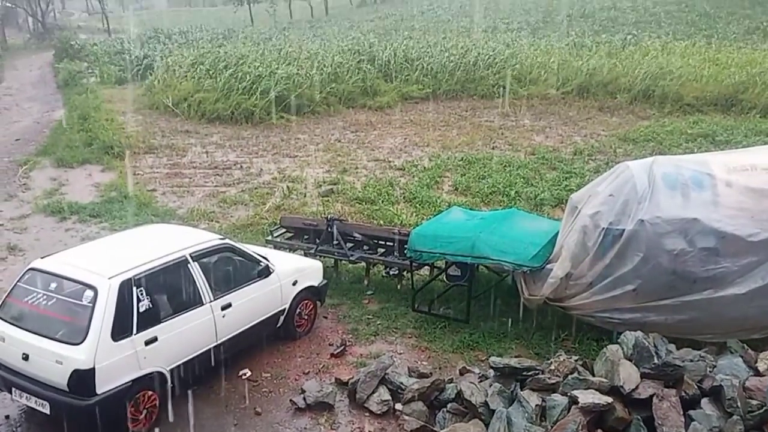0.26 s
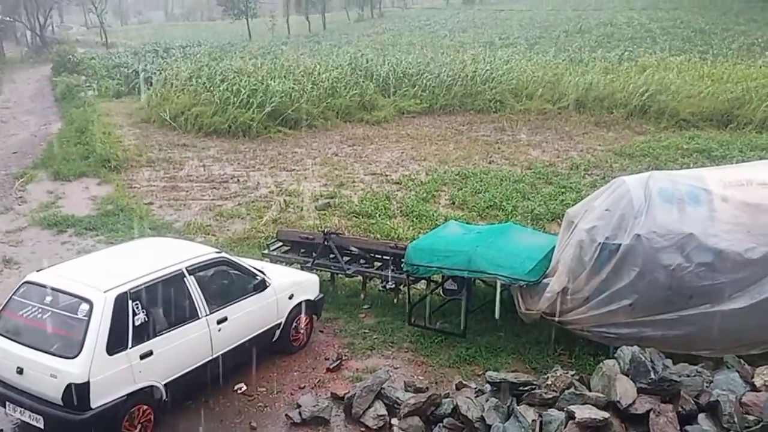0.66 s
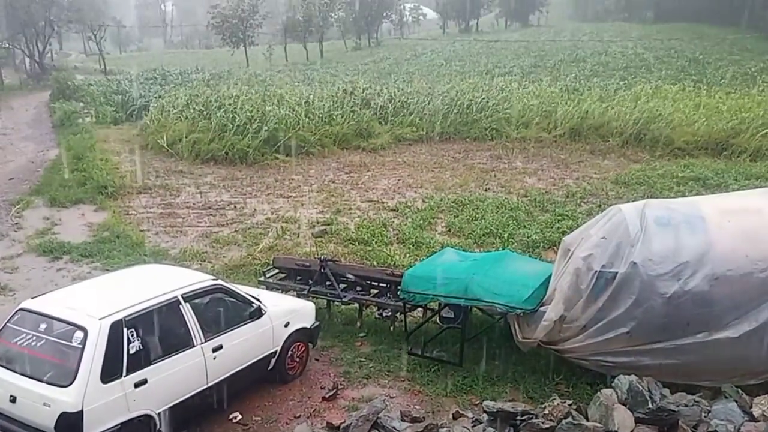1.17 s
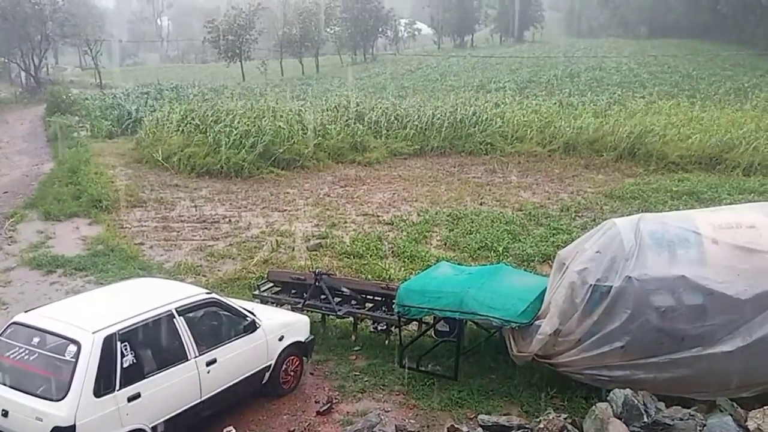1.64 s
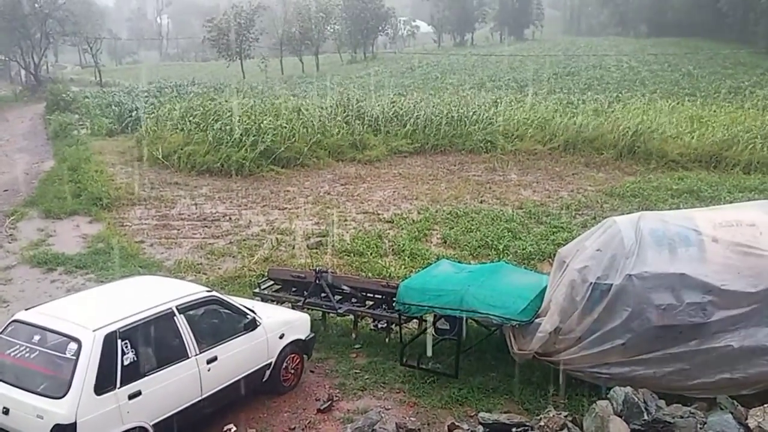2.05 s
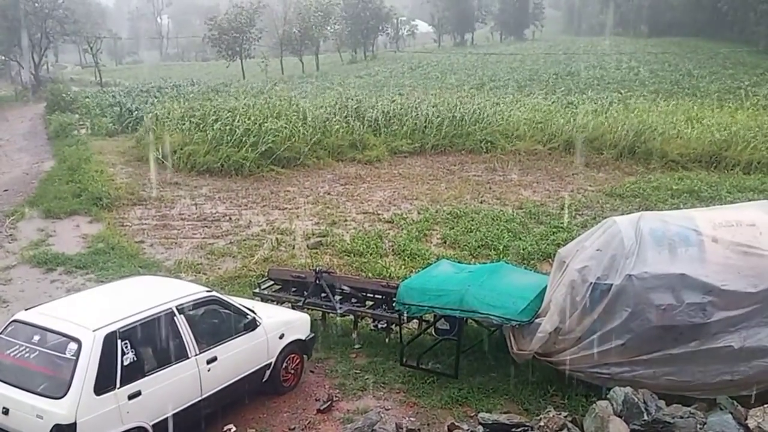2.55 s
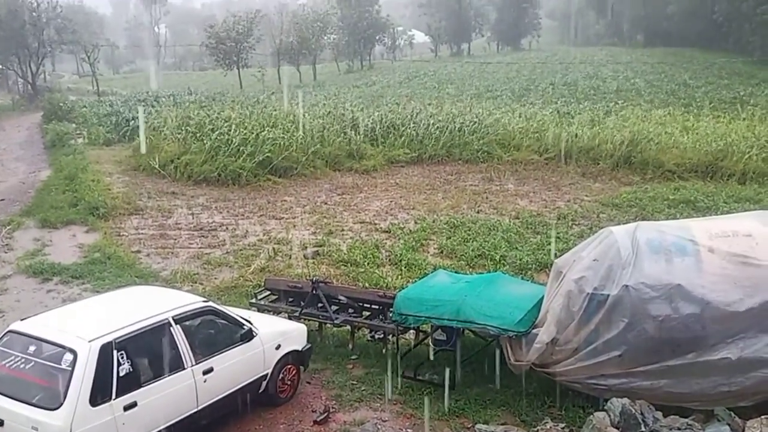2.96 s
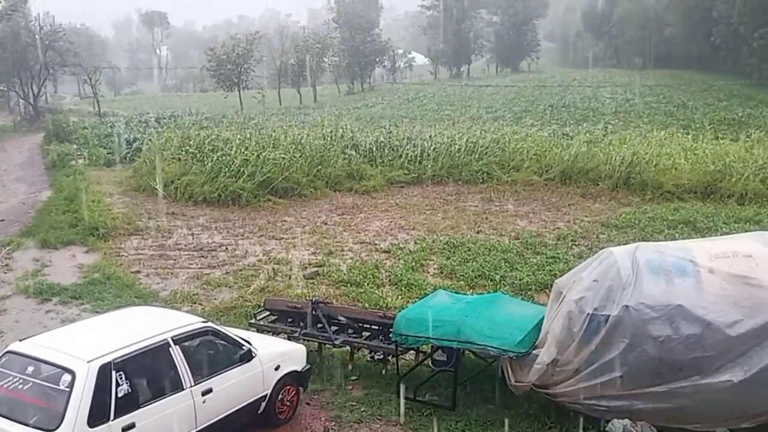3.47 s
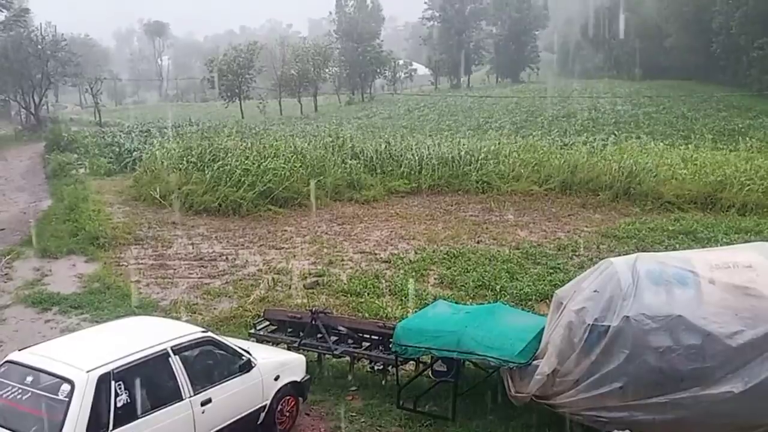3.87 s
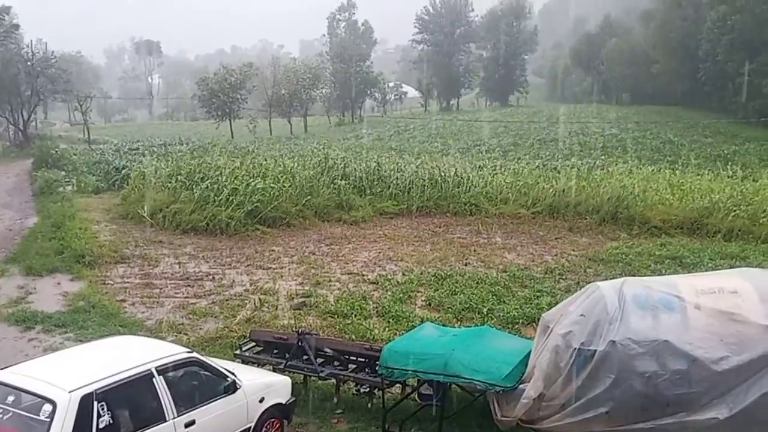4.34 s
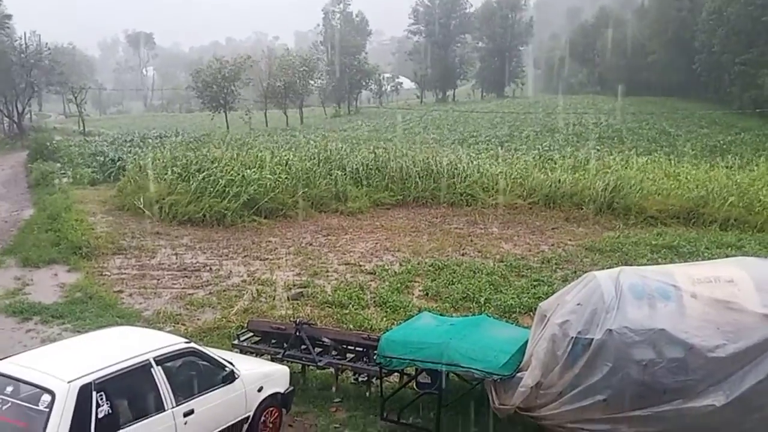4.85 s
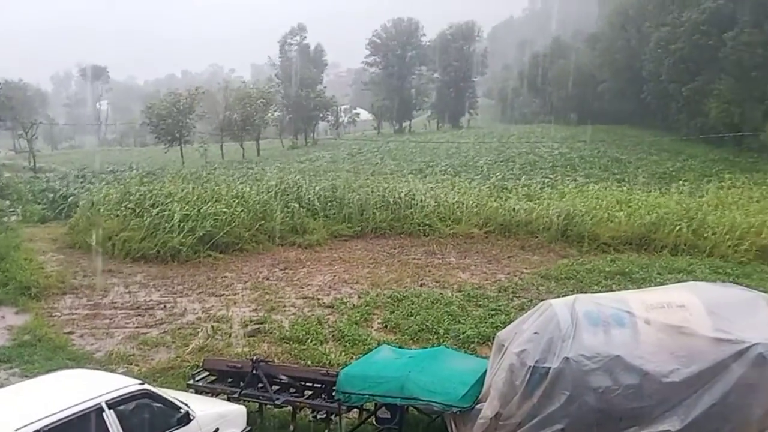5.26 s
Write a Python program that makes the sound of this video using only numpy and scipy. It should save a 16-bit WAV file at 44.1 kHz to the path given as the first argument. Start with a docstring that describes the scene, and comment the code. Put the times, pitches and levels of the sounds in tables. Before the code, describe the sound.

Heavy rain falls on open fields and a muddy yard, making an even hiss with a finer patter on leaves, stones and puddles. Fat drops splat close by throughout, and from about one second an occasional drip plinks into a puddle. Wind rumbles and puffs against the microphone, lulls midway, then builds again toward the end. It is heard from a sheltered spot above the yard.

```python
"""Heavy rain on open fields and a muddy yard, heard in mono from a sheltered spot above.
From the start, countless far impacts sum to a hiss, nearer ones patter on mud, stones and leaves,
bubbles ring in puddles, and turbulence rumbles at the microphone. Fat drops soon splat close by and
eddies buffet the port; from about 1 s an occasional heavy drip rings. The wind lulls around 3 s and
builds again from 4 s to the end, while the shower eases very slightly throughout."""
import sys
import numpy as np
from scipy import signal
from scipy.fft import rfft, irfft
from scipy.io import wavfile

SR = 44100
rng = np.random.default_rng(int(sys.argv[2]) if len(sys.argv) > 2 else 0)


def unload_wav(signal):
    """Save mono or channel-first audio to the path in sys.argv[1] as 16-bit WAV at rate SR, clipped to [-1, 1]."""
    wavfile.write(
        sys.argv[1],
        SR,
        np.round(np.clip(np.atleast_2d(signal).T, -1, 1) * 32767).astype(np.int16),
    )


N = 242987


def from_db(db):
    """Amplitude ratio of a level in decibels."""
    return 10 ** (np.asarray(db) / 20)


def unit_power(x):
    """Normalisation to a mean square of one."""
    return x / np.sqrt(np.mean(x ** 2) + 1e-20)


def drift(per_s):
    """Low-pass noise of unit spread that changes about per_s times a second."""
    step, settle = 40, 2000  # samples per point, points discarded
    pole = np.exp(-2 * np.pi * step * per_s / SR)
    slow = signal.lfilter([1], [1, -2 * pole, pole ** 2], rng.standard_normal(N // step + settle + 2))
    slow = unit_power(slow[settle:])
    return np.interp(np.arange(N) / step, np.arange(len(slow)), slow)


def coloured(x, spectrum):
    """Spectral shaping by levels interpolated over log frequency; the result has unit power."""
    hz, level_db = np.transpose(spectrum)
    bins_hz = np.maximum(np.fft.rfftfreq(N, 1 / SR), 1)
    gain = from_db(np.interp(np.log(bins_hz), np.log(hz), level_db))
    return unit_power(irfft(rfft(x) * gain, N))


def filtered(x, hz, kind, order=2):
    """Filtering with a maximally flat passband."""
    return signal.sosfilt(signal.butter(order, hz, kind, fs=SR, output="sos"), x + 1e-18)


def band(x, hz, octaves):
    """Band-pass filtering about a geometric centre frequency."""
    return filtered(x, [hz * 2 ** (-octaves / 2), min(hz * 2 ** (octaves / 2), .47 * SR)], "band")


def add_at(out, at, sound):
    """Linear superposition of a sound starting at sample `at`."""
    out[at:at + len(sound)] += sound[:N - at]


# Spectral density of the rain's hiss, patter and ticks: f/Hz, relative level/dB
RAIN_SPECTRUM = [(150, -15), (480, -5.5), (730, -8), (1100, -4), (1400, -5.5), (2500, 0), (4200, -0.3),
                 (4800, -3.5), (6100, 0.23), (7400, -2.5), (9100, -12), (12300, -16), (15400, -8)]


def far_hiss(waver_db):
    """Incoherent summation: impacts all over the fields, too many to resolve, merge into noise."""
    noise = rng.standard_normal(N) * from_db(waver_db * drift(per_s=2.8))
    return coloured(noise, RAIN_SPECTRUM)


def drop_energies(per_s, spread_db):
    """Random arrivals: most drops are small or far, and the shelter's edge limits the nearest."""
    amplitudes = from_db(spread_db * np.minimum(rng.exponential(1, N), 3.5))
    return (rng.random(N) < per_s / SR) * amplitudes ** 2


def die_away(energies, decay_s):
    """Exponential decay: each pulse of energy is spread over a tail."""
    pole = np.exp(-1 / (decay_s * SR))
    return signal.lfilter([1 - pole], [1, -pole], energies + 1e-18)


def patter(per_s_per_band, spread_db, impact_s, spray_s, spray_ratio, octaves):
    """Shot noise: each nearer impact is a short burst in one band, followed by a tail of spray."""
    out = np.zeros(N)
    for hz in np.geomspace(2200, 14000, num=9):
        drops = drop_energies(per_s_per_band, spread_db)
        power = die_away(drops, impact_s) + spray_ratio * die_away(drops, spray_s)
        bursts = np.sqrt(power) * rng.choice([-1, 1], N)
        out += band(unit_power(bursts), hz, octaves)
    return coloured(out, RAIN_SPECTRUM)


def ticks(per_s, spread_db, low_hz):
    """Impulsive excitation: brief impacts on stone and hard wet ground give bright clicks."""
    clicks = np.sqrt(drop_energies(per_s, spread_db)) * rng.choice([-1, 1], N)
    return coloured(filtered(clicks, low_hz, "high"), RAIN_SPECTRUM)


def bubble(hz, decay_cycles):
    """Damped oscillation: air trapped by a drop rings briefly while its pitch rises."""
    t = np.arange(SR // 30) / SR
    age = t * hz / decay_cycles  # in time constants
    return np.exp(-age) * np.sin(2 * np.pi * hz * t * (1 + .012 * age))


def plinks(per_s, spread_db, decay_cycles, low_hz, high_hz):
    """Air entrainment: small drops land in puddles at random and trap bubbles of many sizes."""
    out = np.zeros(N)
    for when, size, pitch in rng.random((int(per_s * N / SR), 3)):
        hz = low_hz * (high_hz / low_hz) ** pitch
        amplitude = from_db(spread_db * min(-np.log(size), 3.2))
        add_at(out, int(when * N), amplitude * bubble(hz, decay_cycles))
    return unit_power(out)


# Strength of the wind at the microphone: t/s, relative level/dB
WIND_STRENGTH = [(0, -32.5), (0.75, -31.5), (1.1, -32), (1.25, -30.5), (1.62, -30), (1.7, -43.5),
                 (1.8, -31), (2.1, -32), (2.18, -38), (2.26, -33), (2.72, -40.5), (2.95, -34.5),
                 (3.1, -36.5), (3.85, -35.5), (4.2, -29.5), (4.5, -32.5), (5.5, -26.5)]
# Spectral density of its rumble: f/Hz, relative level/dB
WIND_SPECTRUM = [(20, -20), (35, -14), (62, -3), (90, 1), (135, -0.5), (220, -6.5), (340, -16),
                 (600, -34.5), (1200, -63)]


def wind_rumble(flutter_db):
    """Turbulence: uneven pressure fluctuations at the microphone port are heard as a rumble."""
    eddies = rng.standard_normal(N) * from_db(flutter_db * drift(per_s=32))
    level_db = np.interp(np.arange(N) / SR, *np.transpose(WIND_STRENGTH))
    return from_db(level_db) * coloured(eddies, WIND_SPECTRUM)


# Fat drops striking the mud close by: t/s, relative level/dB, centre f/Hz
FAT_DROPS = [(0.075, -33, 13500), (0.245, -28, 6950), (0.303, -31, 6450), (0.371, -25, 5860),
             (0.571, -25, 6500), (0.798, -23, 3250), (0.952, -28, 3600), (1.227, -22.5, 2800),
             (1.243, -22, 4600), (1.618, -24, 6000), (2.715, -29, 6000), (2.797, -24, 3640),
             (3.016, -24.5, 6300), (3.123, -27, 3050), (3.409, -24, 5850), (3.857, -24.5, 4970),
             (3.962, -30, 13700), (4.23, -24.5, 6100), (4.325, -26, 2880), (4.605, -25.5, 2980),
             (4.683, -23.5, 6000), (4.991, -24, 2970), (5.094, -29, 6600)]


def splats(impact_s, spray_s, spray_db, octaves):
    """Primary and secondary impact: a fat drop slaps the mud, then its droplets fall back."""
    out, t = np.zeros(N), np.arange(SR // 10) / SR
    envelope = np.exp(-t / impact_s) + from_db(spray_db) * np.exp(-t / spray_s)
    for start_s, level_db, hz in FAT_DROPS:
        burst = band(envelope * rng.choice([-1, 1], len(t)), hz, octaves)
        add_at(out, round(start_s * SR), from_db(level_db) * unit_power(burst))
    return out


# Strong eddies reaching the microphone: t/s at the crest, relative level/dB
STRONG_EDDIES = [(0.269, -26.5), (0.454, -19), (0.774, -23), (1.177, -16), (1.32, -20), (1.561, -17),
                 (1.596, -16), (1.816, -20.5), (1.914, -16.5), (1.951, -18.5), (2.29, -22), (2.955, -22.5),
                 (5.099, -22), (5.29, -21.5), (5.343, -22), (5.378, -15.5)]


def buffets(hz, octaves, swell_s, top_hz):
    """Pressure transients: each strong eddy hits the port as a quick, dull puff."""
    out, t = np.zeros(N), np.arange(SR // 8) / SR
    envelope = t / swell_s * np.exp(-t / swell_s)
    for crest_s, level_db in STRONG_EDDIES:
        puff = band(envelope * rng.standard_normal(len(t)), hz, octaves)
        add_at(out, round((crest_s - swell_s) * SR), from_db(level_db) * unit_power(puff))
    return filtered(out, top_hz, "low")


# Heavy drips falling into a puddle: t/s, relative level/dB, initial f/Hz
HEAVY_DRIPS = [(0.943, -23, 2890), (1.4413, -22, 2570), (1.6756, -22, 2920), (2.427, -32, 3070),
               (3.5681, -25, 2440), (4.182, -21.5, 2450)]


def drips(decay_cycles):
    """Bubble resonance: heavy drips trap larger bubbles, which ring low and a little longer."""
    out = np.zeros(N)
    for start_s, level_db, hz in HEAVY_DRIPS:
        add_at(out, round(start_s * SR), from_db(level_db) * bubble(hz, decay_cycles))
    return out


def shower_gain(start_db, easing_db_per_s, swell_db):
    """Amplitude modulation: the shower eases very slowly and swells a little by chance."""
    return from_db(start_db - easing_db_per_s * np.arange(N) / SR + swell_db * drift(per_s=7))


def scene():
    """Superposition: rain, close drops and wind add, the same in both channels."""
    far = from_db(-3.5) * far_hiss(waver_db=0.44)
    near = from_db(-4.5) * patter(per_s_per_band=150, spread_db=4.2, impact_s=0.00092,
                                  spray_s=0.0087, spray_ratio=0.87, octaves=0.74)
    stones = from_db(-10.5) * ticks(per_s=500, spread_db=5.0, low_hz=5000)
    puddles = from_db(-15.5) * plinks(per_s=300, spread_db=4.0, decay_cycles=7, low_hz=2237, high_hz=8100)
    shower = shower_gain(start_db=-24, easing_db_per_s=0.3136, swell_db=0.56)
    rain = shower * (far + near + stones + puddles)
    rumble = from_db(-0.6) * wind_rumble(flutter_db=1.5)
    mud = from_db(-10.5) * splats(impact_s=0.0009, spray_s=0.022, spray_db=-11, octaves=0.74)
    puffs = from_db(-14.0) * buffets(hz=137, octaves=1.68, swell_s=0.0073, top_hz=453)
    rings = from_db(-0.5) * drips(decay_cycles=23)
    return np.tile(rain + rumble + mud + puffs + rings, (2, 1))


def record(dry):
    """Band limiting: the microphone loses the deepest bass, and the top is cut steeply."""
    low_hz, top_hz = 45, 15600
    lean = filtered(dry, low_hz, "high", order=3)
    return signal.sosfilt(signal.ellip(12, .1, 80, top_hz, fs=SR, output="sos"), lean)


dry = scene()
out = record(dry)
unload_wav(out)
```